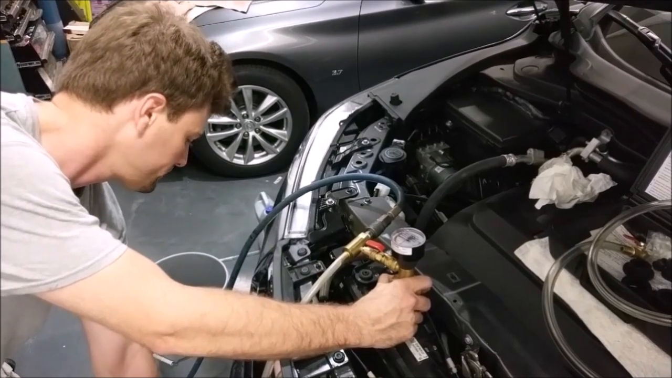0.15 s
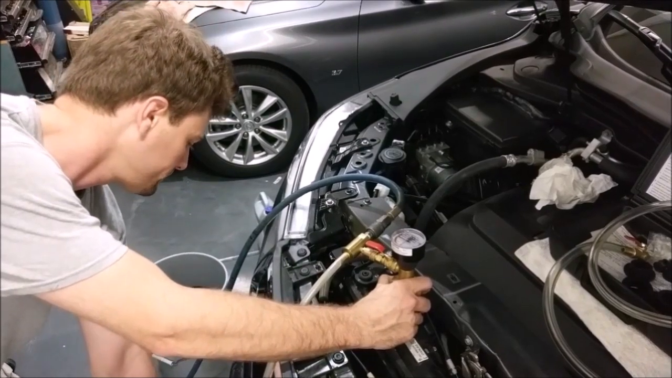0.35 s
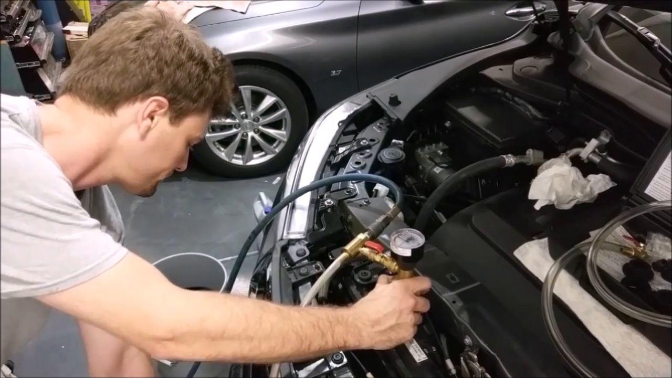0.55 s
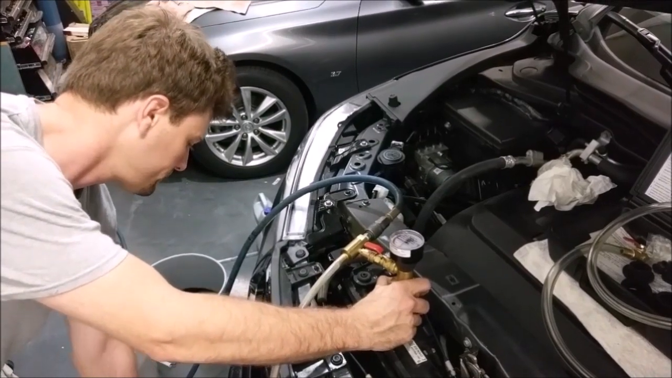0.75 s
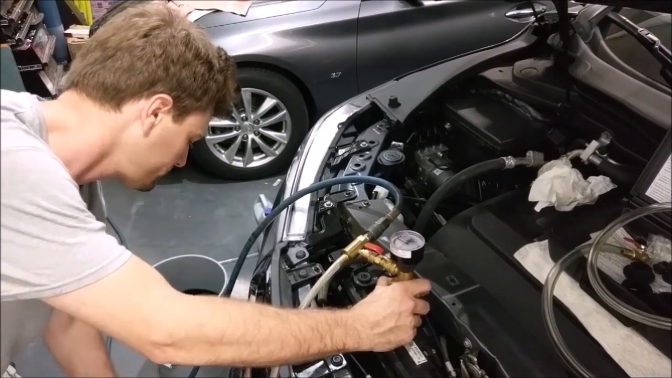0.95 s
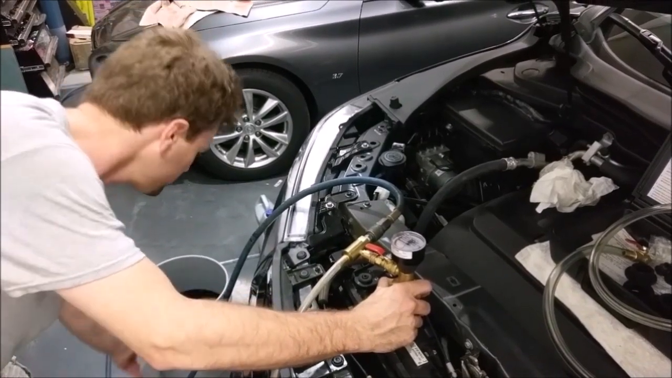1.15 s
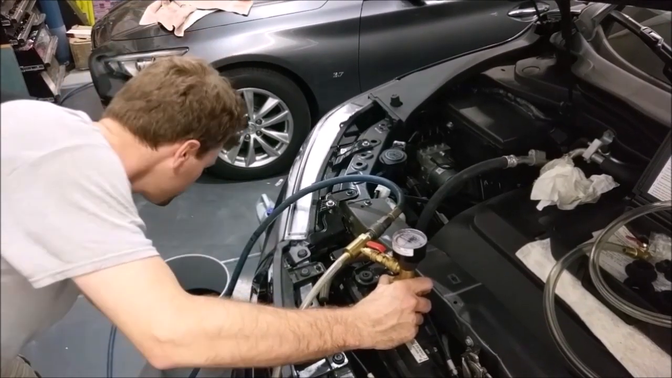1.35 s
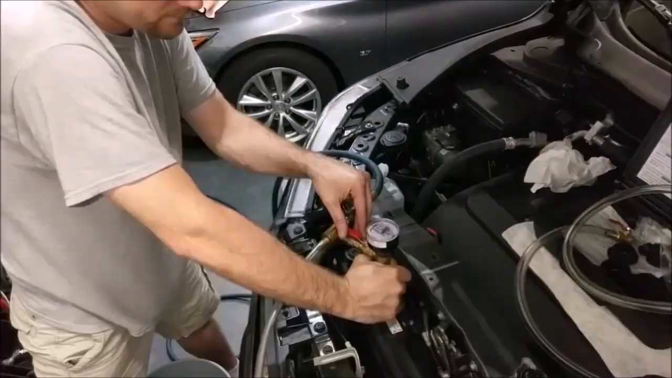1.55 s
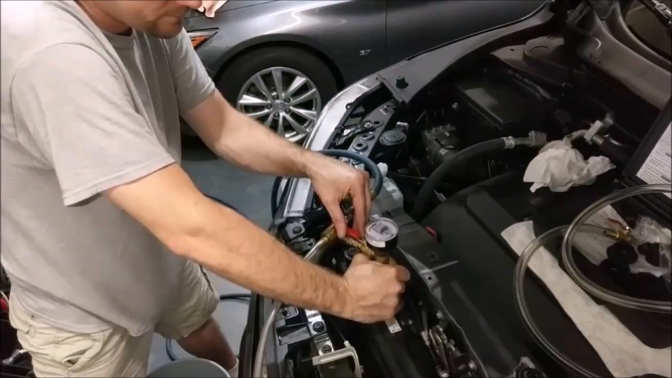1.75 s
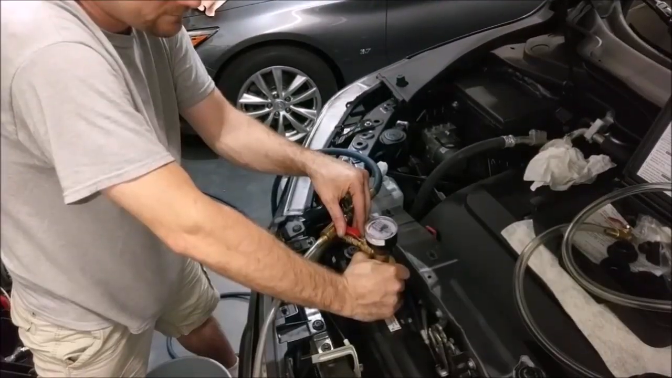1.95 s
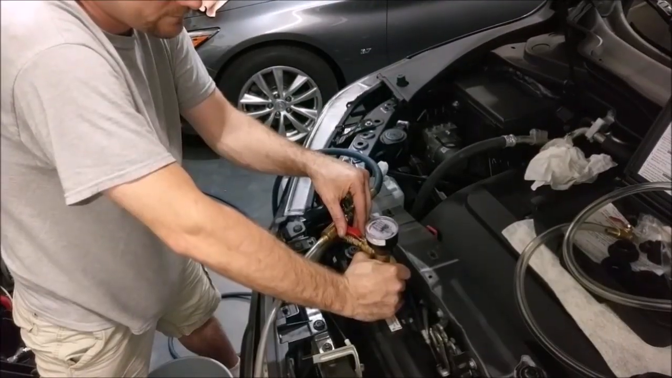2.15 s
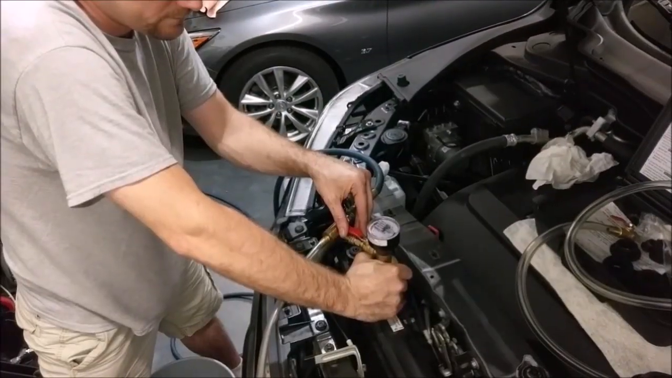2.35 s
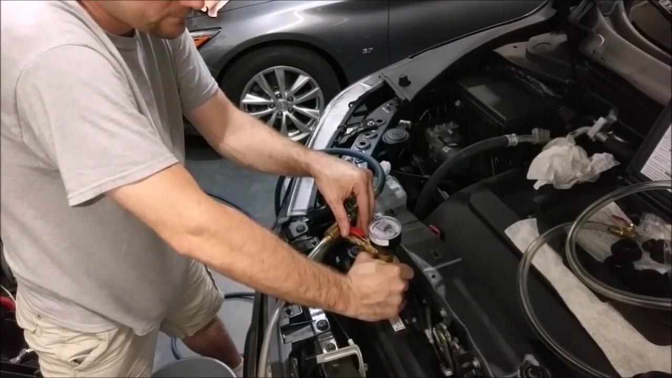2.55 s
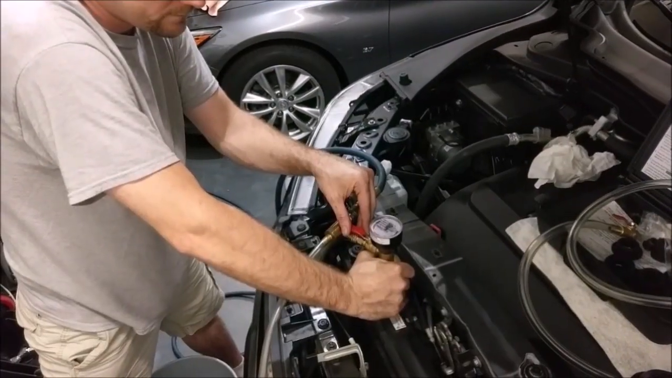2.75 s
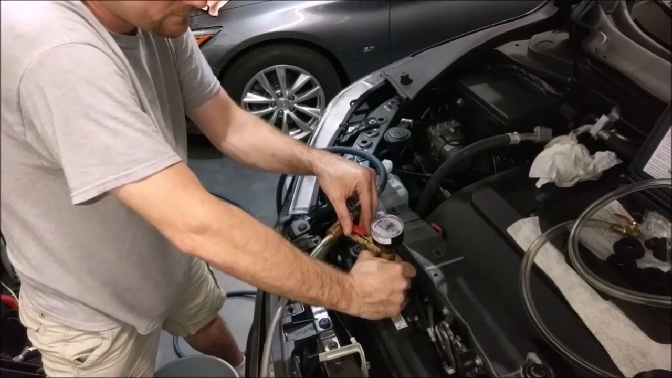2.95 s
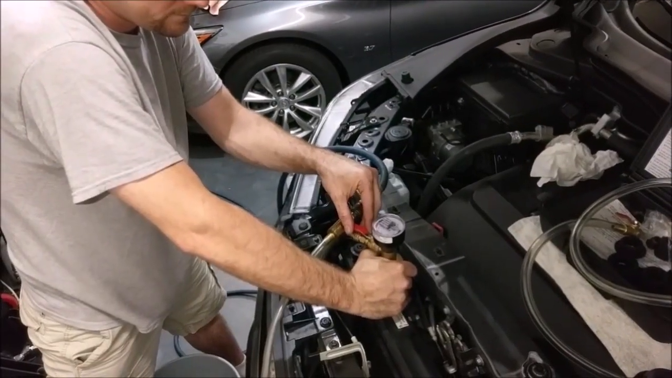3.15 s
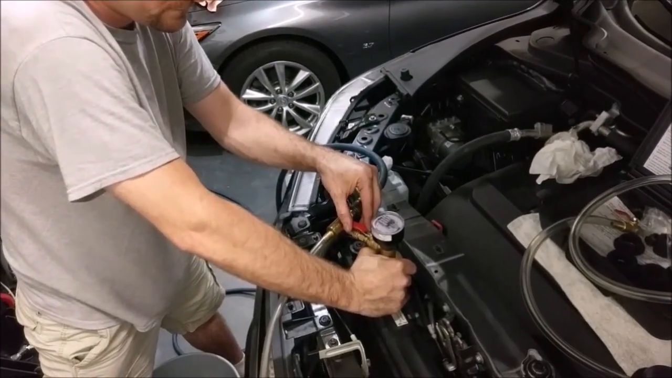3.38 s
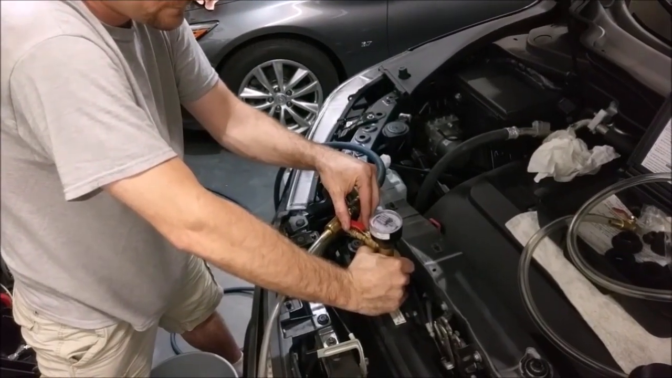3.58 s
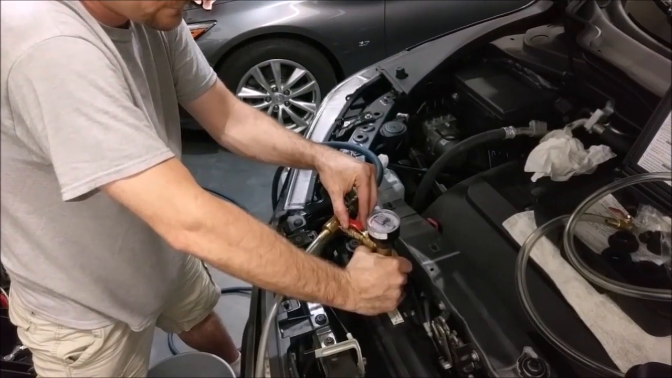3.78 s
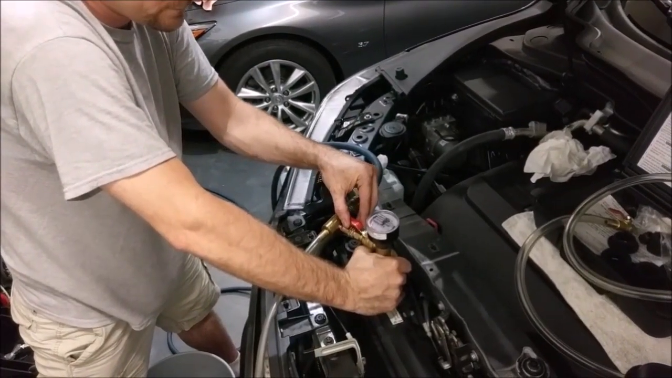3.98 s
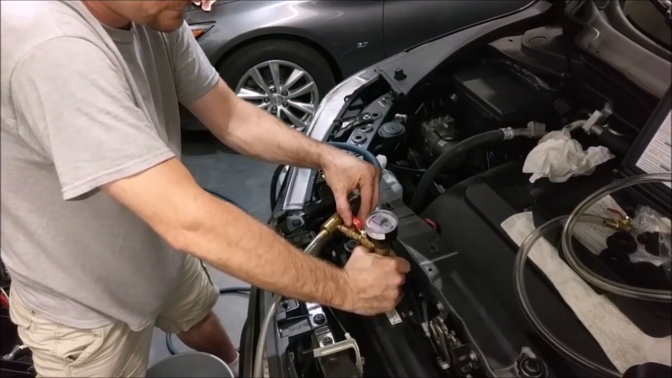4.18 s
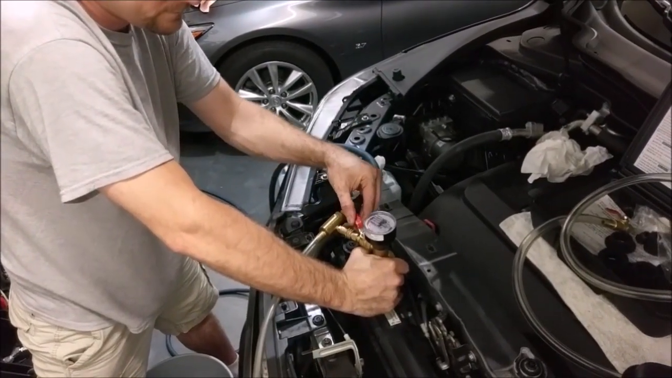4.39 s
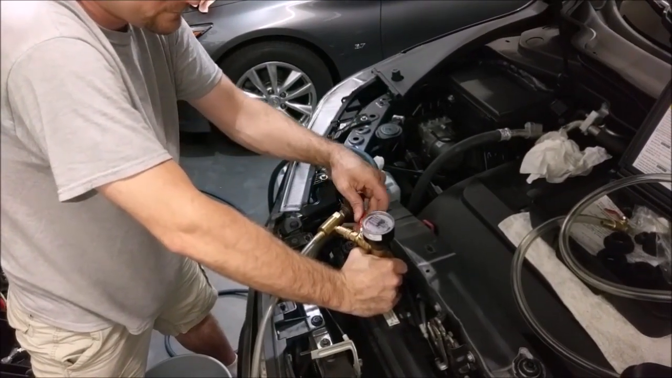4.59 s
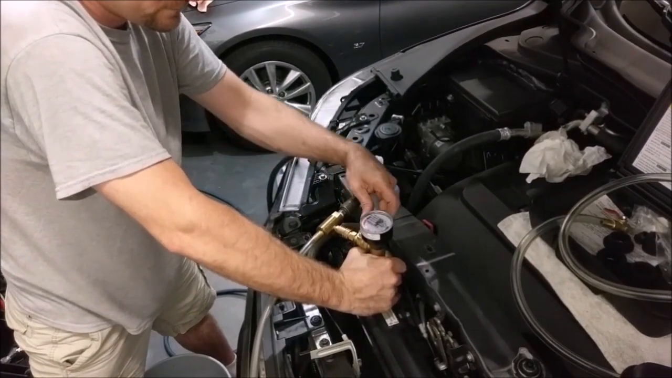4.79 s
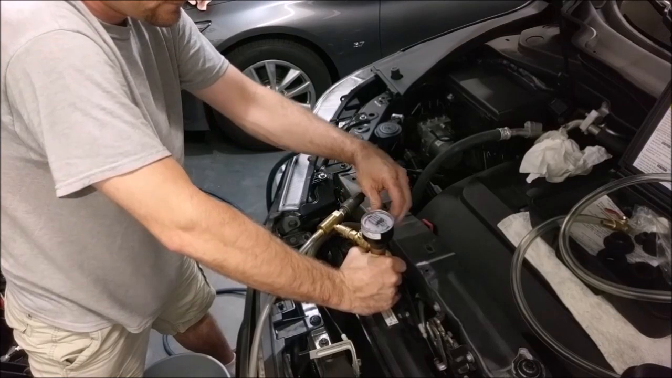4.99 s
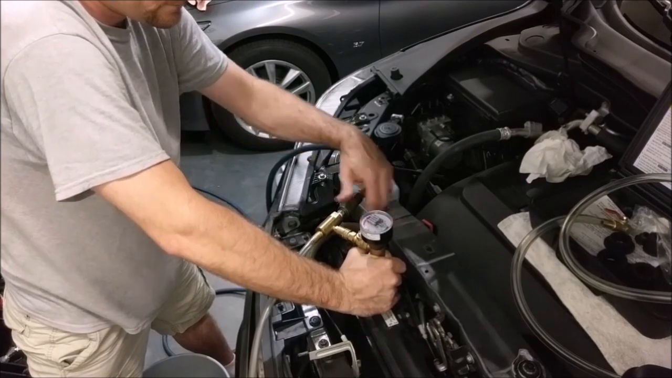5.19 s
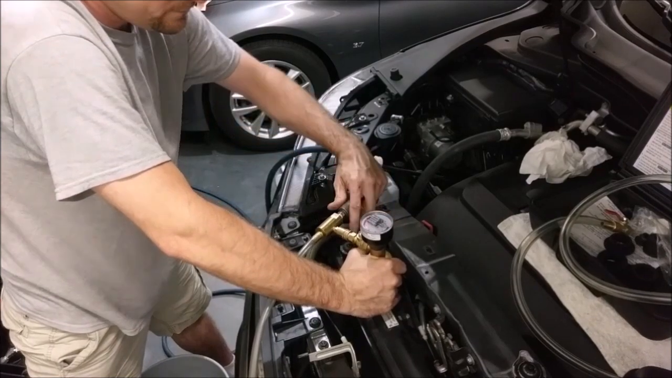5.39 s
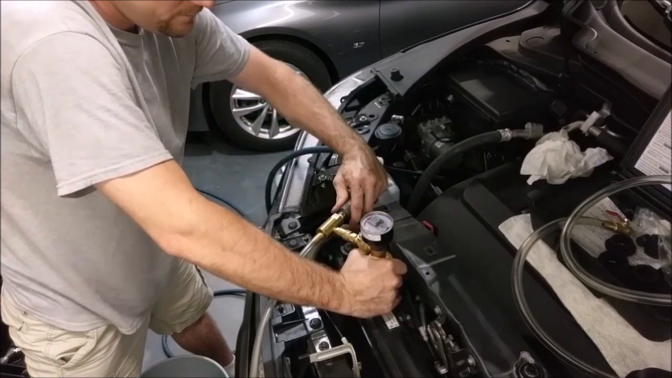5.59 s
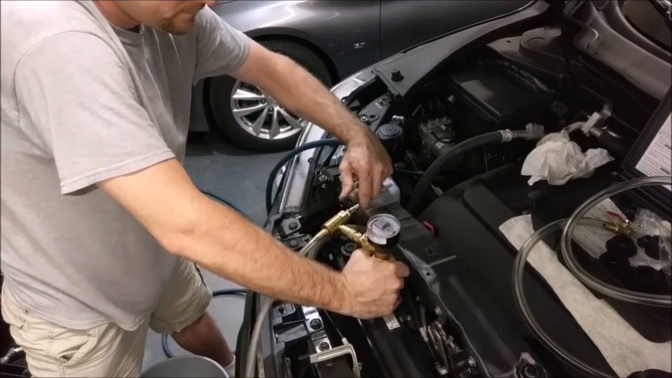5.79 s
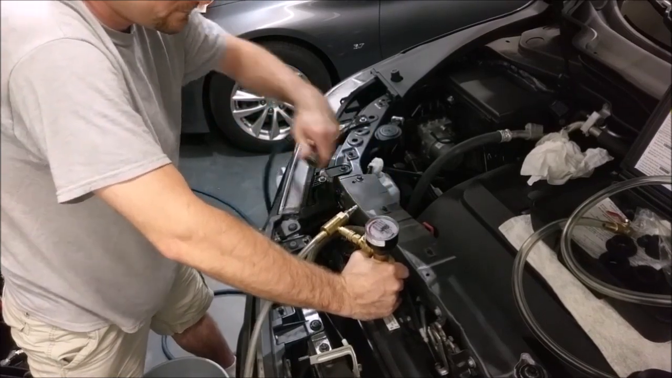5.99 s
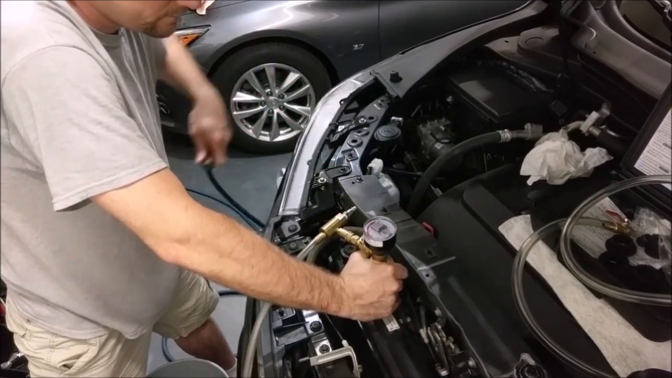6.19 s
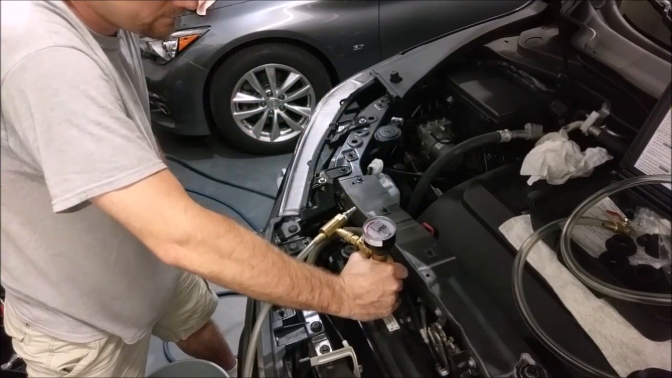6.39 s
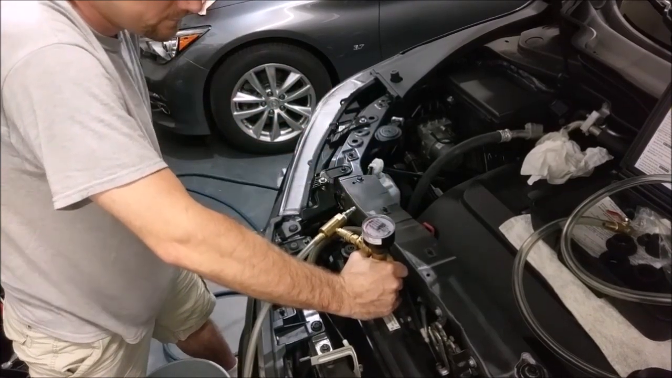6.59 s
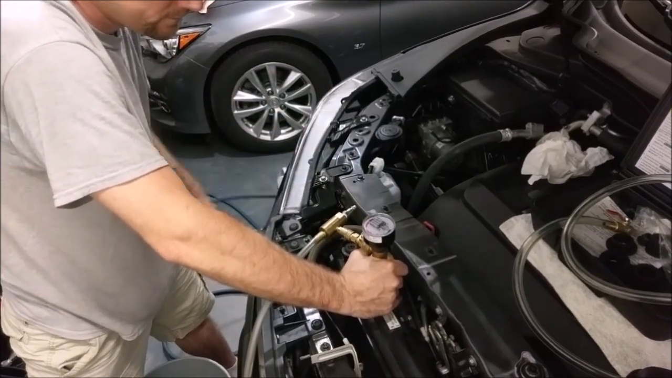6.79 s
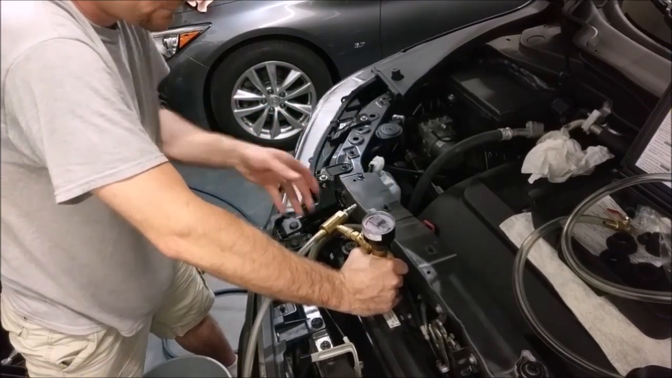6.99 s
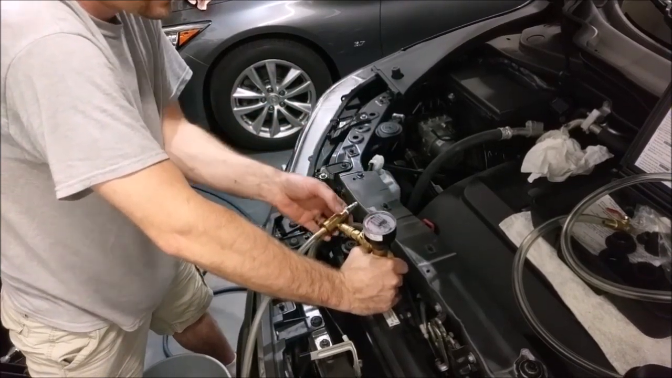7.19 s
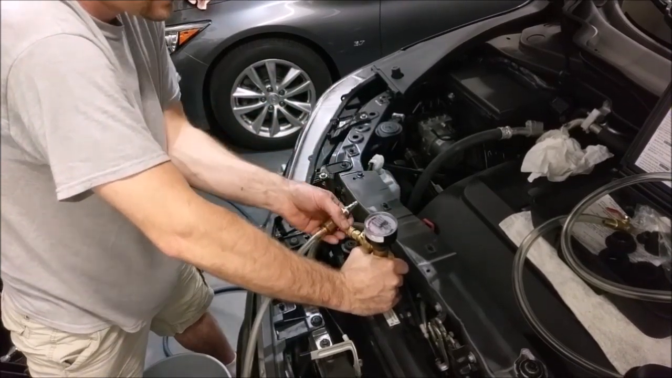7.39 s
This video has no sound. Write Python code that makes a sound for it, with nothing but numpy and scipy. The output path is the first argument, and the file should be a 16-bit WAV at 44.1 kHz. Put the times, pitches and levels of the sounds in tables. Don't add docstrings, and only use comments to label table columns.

```python
import sys
import numpy as np
from scipy import signal
from scipy.fft import rfft, irfft, next_fast_len
from scipy.io import wavfile
from scipy.ndimage import uniform_filter1d

SR = 44100
rng = np.random.default_rng(int(sys.argv[2]) if len(sys.argv) > 2 else 0)


def dump_mix(stems):
    frames = np.atleast_2d(stems).T
    limited = np.clip(frames, -1, 1)
    pcm = np.round(limited * 32767).astype(np.int16)
    wavfile.write(sys.argv[1], SR, pcm)


def invert_db(level):
    return 10 ** (np.asarray(level, dtype=float) / 20)


N = 328104
SIZE = next_fast_len(N + SR)
HZ = np.maximum(np.arange(SIZE // 2 + 1) * SR / SIZE, 1)
TIME = np.arange(N) / SR

# pitch_hz, level_db (per Hz)
EARLY_JET = [(330, -36.5), (420, -31), (700, -26.5), (1100, -23), (1700, -21.5), (2600, -16.5), (3300, -12),
             (5000, -9.5), (7500, -6), (9800, -4.5), (11900, -1.8), (13300, -1.5), (14300, -4.5),
             (15100, -9)]
LATE_JET = [(330, -27), (420, -29.5), (700, -28), (1100, -19.5), (1700, -18), (2600, -18), (3300, -13),
            (5000, -13.5), (7500, -10), (9800, -7), (11900, -0.8), (13300, -0.6), (14300, -5.5),
            (15100, -7)]
# pitch_hz, width_hz, left_lift_db, right_lift_db
EARLY_PEAKS = [(455, 46, 6.5, 9.5), (631, 59, 4.5, 7), (800, 35, 7, 3), (1002, 102, 7.5, 8.5),
               (1202, 60, 10.5, -1), (1332, 130, 9.5, 4.5), (1723, 170, 3, 3.5), (2864, 110, 6.5, 2.5),
               (2980, 65, 2, 4), (4100, 95, 5, 4.5), (4400, 63, 3.5, 4), (4660, 110, 7.5, 3),
               (12400, 120, 5, 3.5), (12900, 90, 3, 3)]
LATE_PEAKS = [(461.8, 94, 19.5, 20.5), (607, 160, 5, 12), (824, 60, 12.5, 10), (1004, 80, 11.5, 10),
              (1386, 49, 6.5, 8.5), (1956, 67, -4.5, 9.5), (3513, 60, 9, 9.5), (5175, 73, 1, 8.5),
              (6330, 114, 2.5, 10.5), (11880, 185, 7, 8.5), (12470, 110, 8.5, 3), (12830, 110, 0.5, 5),
              (13200, 74, 7, -4.5), (290, 45, 6.5, 7)]
# pitch_hz, left_minus_right_db
EARLY_LEAN = [(420, 0), (700, -2.5), (1100, 1), (1700, 0), (2600, 0.7), (3300, -2.4), (5000, -5),
              (7500, -6.5), (9800, -0.6), (11900, 1.3), (13300, 6), (14300, 3)]
LATE_LEAN = [(420, -0.3), (700, 0), (1100, -0.5), (1700, -3.5), (2600, -7.5), (3300, -4.5), (5000, -2.5),
             (7500, -3.5), (9800, 1.5), (11900, 2.5), (13300, 5), (14300, 3)]
# pitch_hz, level_db
DIRECT = [(100, 11), (600, 5), (1400, -2), (3000, -12), (8000, -10.5), (15000, -7.5)]
# pitch_hz, level_db (per Hz)
POP = [(50, -21), (100, 0), (150, -7), (390, -5.5), (530, -3), (830, -8), (1060, -13), (1400, -21),
       (2600, -40)]
# start_s, peak_db, pan_db
POP_AT = (5.732, -18.5, -1)
# pitch_hz, level_db (per Hz)
CRACK = [(47, -39), (80, -6), (425, -3), (1510, -21), (1940, -7.5), (3020, -15), (3950, -14), (4320, -20),
         (4720, -11), (8240, -17.5), (9000, -11.5), (11800, -9), (12600, 0), (15400, -21), (16400, -22)]
# pitch_hz, level_db, t60_s
COUPLER_RINGS = [(1950, -12.5, .2), (6960, -26, .3), (12550, -12, .45), (12960, -13, .3)]
# pitch_hz, level_db
CATCH_RINGS = [(2000, -16), (4450, 0.5), (7200, -3), (10600, -16), (14940, -12)]
# start_s, peak_db
SNAPS = [
    (6.13, -29.5),
    (6.262, -51),
]
# start_s, peak_db, pitch_hz, t60_s
TICKS = [
    (6.283, -52, 12300, .03),
    (6.37, -64, 4300, .12),
    (6.548, -62, 12500, .046),
    (6.725, -54, 7500, .01),
    (6.737, -54, 12500, 0.12),
    (6.758, -56, 13500, .05),
    (6.758, -61, 8000, .05),
]
# start_s, peak_db, length_s, brightness_db (per octave)
THUDS = [
    (.61, -45.5, .1, -5.5),
    (6.068, -47, .025, 7),
    (6.075, -39, 0.062, 1.5),
    (6.756, -32.5, 0.12, 0),
]
# pitch_hz, level_db (per Hz)
THUD = [(47, -31), (80, -2.5), (346, -2.5), (674, -20), (779, -16), (1120, -20), (1730, -33.5), (2760, -33),
        (3680, -43.5), (6000, -58.5), (7800, -94), (13200, -120)]
# pitch_hz, t60_s
GARAGE = [(100, 0.55), (400, 0.51), (1500, 0.62), (5000, 0.69), (10000, 0.52), (16000, 0.11)]
# pitch_hz, left_right_likeness (-1 to 1)
ROOM_ALIKE = [(100, .9), (500, 0.7), (1500, 0.19), (16000, 0.0121)]
# pitch_hz, level_db (per Hz)
FLOOR = [(12, -32), (20, -5), (32, -21), (58, -10.5), (91, -19), (102, -11), (124, -15.5), (212, -14),
         (340, -22.5), (4390, -40), (6690, -42.5), (12400, -38.5), (15100, -41), (16400, -65)]
# pitch_hz, left_right_likeness (-1 to 1)
FLOOR_ALIKE = [(60, -0.1), (130, 0.38), (290, 0.36), (640, 0.00052), (1410, -0.08), (3100, 0.078),
               (6820, -0.06), (15000, 0.03)]

EARLY_DB, LATE_DB = -15, -19.5
UNSHADE_DB_PER_S = 2.5
SURGE_S, SURGE_DB = 0.075, 1
SHUT_S, SHUT_DB_PER_S = 5.746, 1299.5
MUTE_S, MUTE_DROP_DB, MUTE_FADE_DB_PER_S = 1.5630, 29, 2300.5
RESUME_S, RESUME_STEP_DB, RESUME_RISE_DB_PER_S = 1.6130, 29, 5499


def jet(jet_db, warm_db, spectrum, peaks, lean, flow, echo_t60, sway_db):
    side_db = at_hz(lean, HZ) * np.array([[.5], [-.5]])
    lift_db = 0
    for hz, width, left_db, right_db in peaks:
        bump = np.exp(-(1.91 * (HZ - hz) / width) ** 2)
        lift_db = lift_db + np.array([[left_db], [right_db]]) * bump
    below = 1 / (1 + (340 / HZ) ** 6)
    colour = invert_db(at_hz(spectrum, HZ) + side_db + lift_db) * below
    turn = 0.35 * TIME + np.arange(3)[:, None] / 3
    shade = invert_db(sway_db * np.sin(2 * np.pi * turn))
    shade = shade / np.sqrt(np.sum(shade ** 2, axis=0))
    streams = rng.standard_normal((3, N)) * flow * invert_db(jet_db) * shade
    paths = [bay_path(lag_s, echo_t60) for lag_s in (.00007, .00011, .00015)]
    total = sum(stream * path for stream, path in zip(rfft(streams, SIZE), paths))
    total = total * rms_one(colour)
    lows = 1 / (1 + (HZ / 1600) ** 6)
    highs = 1 / (1 + (4500 / HZ) ** 6)
    low, middle, high = [irfft(total * mask, SIZE)[:, :N] for mask in (lows, 1 - lows - highs, highs)]
    return low * invert_db(warm_db) + middle * invert_db(warm_db / 4) + high


def bay_path(lag_s, echo_t60):
    t = np.arange(SR // 5) / SR
    echoes = rng.standard_normal((2, len(t))) * invert_db(-60 * t / echo_t60)
    echoes = rfft(echoes / np.sqrt(np.sum(echoes ** 2) / 2), SIZE)
    direct = invert_db(at_hz(DIRECT, HZ))
    arrival = np.exp(-2j * np.pi * HZ * np.array([[0], [lag_s]]))
    return evened(direct * arrival + echoes, 70)


def valve():
    surge_db = SURGE_DB * np.clip((TIME - SHUT_S) / SURGE_S + 1, 0, 1)
    return invert_db(2 + surge_db - SHUT_DB_PER_S * np.maximum(TIME - SHUT_S, 0))


def pop():
    burst = blow(POP, [(80, 0.18), (400, 0.086), (1500, 0.11)], push=0.93, tail_db=-5.5)
    return place(np.zeros((2, N)), burst, *POP_AT)


def coupler():
    length_s = 0.081
    decays = [(100, 2.0 * length_s), (1000, 2.2 * length_s), (12000, 1.4 * length_s)]
    burst = blow(CRACK, decays, push=1.0, tail_db=0.0)
    t = np.arange(burst.shape[1]) / SR
    for hz, db, t60 in COUPLER_RINGS:
        burst = burst + invert_db(db - 10) * rough_ring(hz, t60, 170 / hz, t)
    return place(np.zeros((2, N)), burst, s=7.074, peak_db=-7.5, pan_db=1.5)


def ticks():
    snap_t60_s, snap_crack_db, tick_crack_db = 0.023, -5, -13
    rebound_dull_db = -11
    main_hz = CATCH_RINGS[1][0]
    contacts = []
    for k, (s, peak_db) in enumerate(SNAPS):
        for hz, db in CATCH_RINGS:
            dull_db = k * rebound_dull_db * np.log2(hz / main_hz)
            contacts.append((s, peak_db + db + dull_db, hz, snap_t60_s, snap_crack_db))
    contacts += [(*tick, tick_crack_db) for tick in TICKS]
    out, t = np.zeros((2, N)), np.arange(SR // 5) / SR
    for s, peak_db, hz, t60, crack_db in contacts:
        crack = invert_db(crack_db) * rough_ring(hz, min(t60, .03), 0.29, t)
        ring = rough_ring(hz, t60, 400 / hz, t)
        out = place(out, ring + crack, s, peak_db, pan_db=-3)
    return out


def thuds():
    out = np.zeros((2, N))
    for s, peak_db, length_s, tilt_db in THUDS:
        tilted = [(hz, db + tilt_db * np.log2(hz / 300)) for hz, db in THUD]
        tail_db = 10 * np.log10(length_s / 0.13)
        burst = blow(tilted, [(80, 2.0 * length_s), (1000, length_s)], push=1.53, tail_db=tail_db)
        out = place(out, burst, s, peak_db, pan_db=-2.5)
    return out


def blow(spectrum, decays, push, tail_db):
    burst = dying(spectrum, decays, ROOM_ALIKE, .5, push)
    swell = 1 - np.exp(-np.arange(burst.shape[1]) / (0.009 * SR))
    burst = burst + invert_db(tail_db) * swell * dying(spectrum, GARAGE, ROOM_ALIKE, .5)
    return burst / np.max(np.abs(burst))


def rough_ring(hz, t60, spread, t):
    edges = [hz * (1 - spread), min(hz * (1 + spread), 19000)]
    band = signal.butter(2, edges, "band", fs=SR, output="sos")
    settle = 400
    mid, side = signal.sosfilt(band, rng.standard_normal((2, len(t) + settle)))[:, settle:]
    return rms_one(mid + 0.79 * side * [[1], [-1]]) * invert_db(-60 * t / t60)


def dying(spectrum, decays, alike, seconds, push=0.0):
    t, out = np.arange(int(seconds * SR)) / SR, 0
    edges = 60 * 2 ** np.arange(0, 8.6, .5)
    for low, high in zip(edges, edges[1:]):
        hz = np.sqrt(low * high)
        white = rng.standard_normal((2, len(t))) * invert_db(-60 * t / max(at_hz(decays, hz), .002))
        white[0, 0] -= push * np.sqrt(SR / (high - low))
        band = signal.butter(2, [low, high], "band", fs=SR, output="sos")
        mid, side = signal.sosfilt(band, white)
        out = out + invert_db(at_hz(spectrum, hz)) * stereo(mid, side, at_hz(alike, hz))
    return out / np.sqrt(np.sum(out ** 2) / 2)


def floor():
    mid, side = rng.standard_normal((2, N))
    same = np.clip(at_hz(FLOOR_ALIKE, HZ), -1, 1)
    colour = invert_db(at_hz(FLOOR, HZ))
    middle = through(mid, colour * np.sqrt(1 + same))
    sides = through(side, colour * np.sqrt(1 - same)) * [[1], [-1]]
    return invert_db(-64) * rms_one(middle + sides)


def stereo(mid, side, alike):
    same = np.clip(alike, -1, 1)
    return np.sqrt(1 + same) * mid + np.sqrt(1 - same) * side * [[1], [-1]]


def place(out, burst, s, peak_db, pan_db):
    start, laid = round(s * SR), out.copy()
    burst = burst[:, :N - start] / np.max(np.abs(burst))
    sides_db = peak_db + np.array([[.5], [-.5]]) * pan_db
    laid[:, start:start + burst.shape[1]] += burst * invert_db(sides_db)
    return laid


def evened(response, width_hz):
    power = uniform_filter1d(np.abs(response) ** 2, size=int(width_hz * SIZE / SR))
    return response / np.sqrt(power + 1e-12)


def through(x, response):
    return irfft(rfft(x, SIZE) * response, SIZE)[..., :N]


def at_hz(points, hz):
    points = np.array(points)
    return np.interp(np.log(hz), np.log(points[:, 0]), points[:, 1])


def rms_one(x):
    return x / np.sqrt(np.mean(np.abs(x) ** 2) + 1e-20)


def scene_change():
    fading = invert_db(-MUTE_DROP_DB - MUTE_FADE_DB_PER_S * np.maximum(TIME - MUTE_S, 0))
    rising = invert_db(-RESUME_STEP_DB - RESUME_RISE_DB_PER_S * np.maximum(RESUME_S - TIME, 0))
    sounding = (TIME < MUTE_S) | (TIME > RESUME_S)
    return invert_db(2.5) * np.where(sounding, 1, fading + rising)


def scene():
    garage = rfft(dying([(40, 4), (16000, 10)], GARAGE, ROOM_ALIKE, 0.93), SIZE)
    flow = valve()
    unshade_db = UNSHADE_DB_PER_S * (TIME - MUTE_S / 2)
    first = jet(EARLY_DB, unshade_db, EARLY_JET, EARLY_PEAKS, EARLY_LEAN, 0.98,
                echo_t60=0.075, sway_db=10)
    second = jet(LATE_DB, 0, LATE_JET, LATE_PEAKS, LATE_LEAN, flow, echo_t60=0.072, sway_db=3)
    room_level = invert_db(at_hz([(300, -6.5), (3000, -4.0), (14000, -6.5)], HZ))
    second = second + through(second.mean(axis=0), evened(garage, 46) * room_level)
    air = np.where(TIME < (MUTE_S + RESUME_S) / 2, first, second)
    sharp = ticks()
    sharp_room = through(sharp, evened(garage, 120) * invert_db(-13))
    blows = pop() + thuds() + coupler() + sharp + sharp_room
    rumble_cut = signal.butter(3, 75, "high", fs=SR, output="sos")
    still = floor()
    shaken = through(still, .75 / (1 + (HZ / 250) ** 8)) * flow
    return air + signal.sosfilt(rumble_cut, blows) + still + shaken


def low_pass(x):
    return signal.sosfilt(signal.butter(12, 16350, fs=SR, output="sos"), x)


def record(dry):
    top_cut = signal.ellip(16, .3, 100, 15720, fs=SR, output="sos")
    mix = signal.sosfilt(top_cut, dry * scene_change()) + .0008
    return low_pass(mix)


dry = scene()
out = record(dry)
dump_mix(out)
```